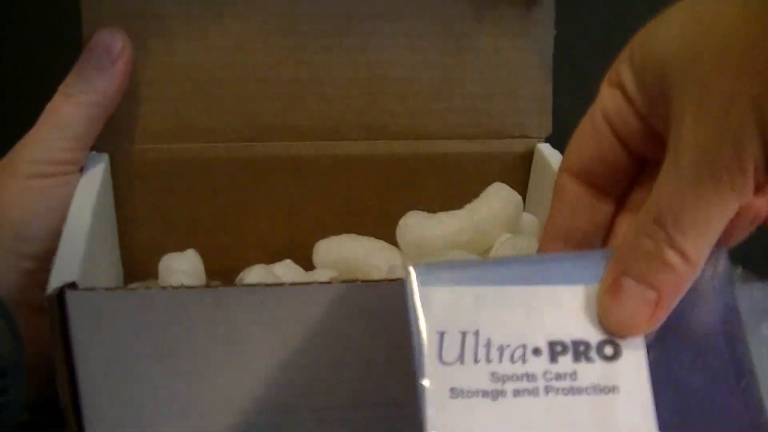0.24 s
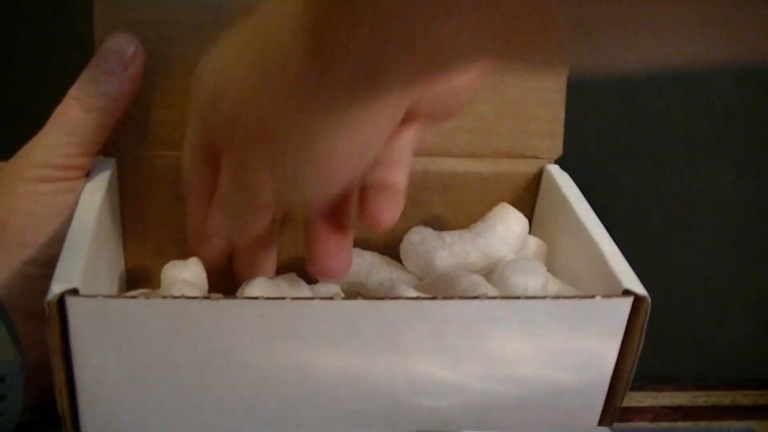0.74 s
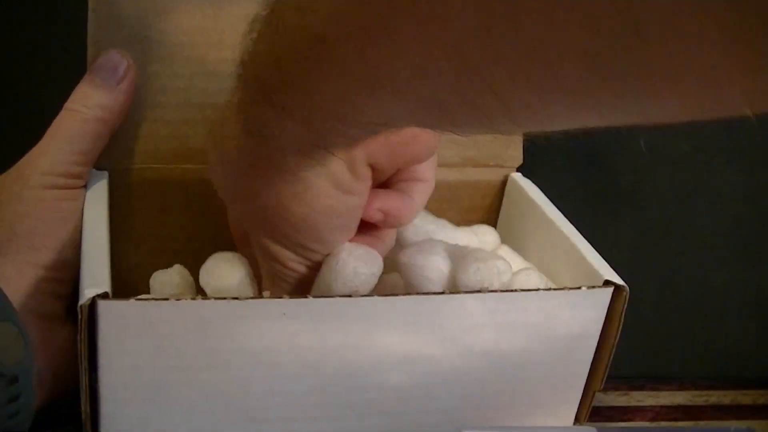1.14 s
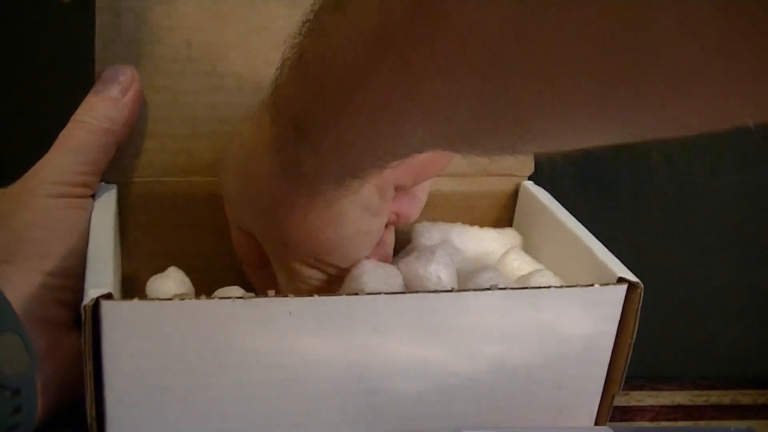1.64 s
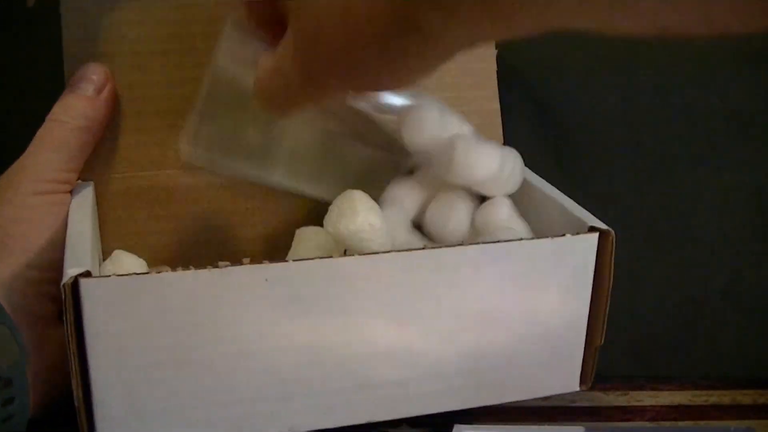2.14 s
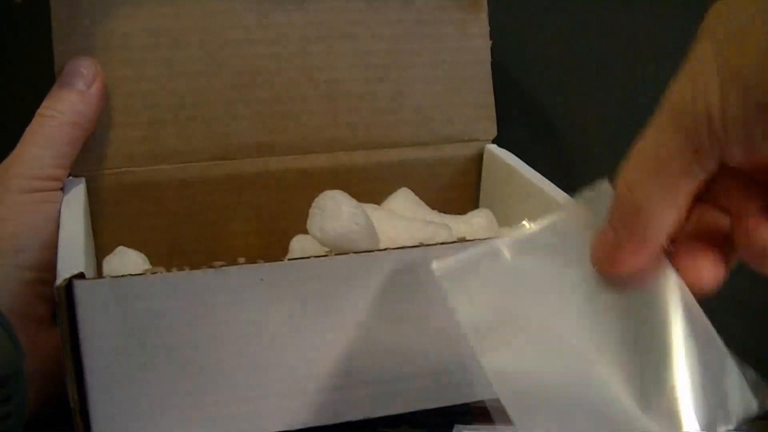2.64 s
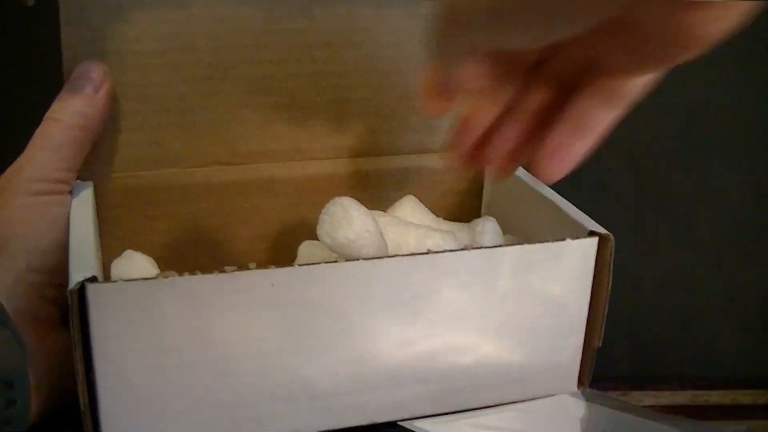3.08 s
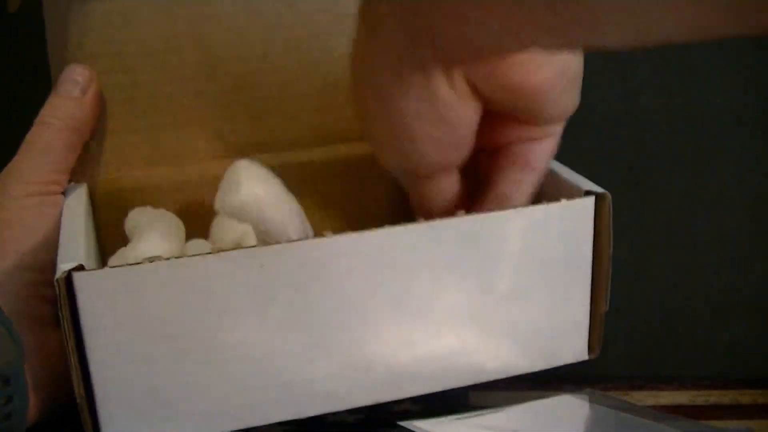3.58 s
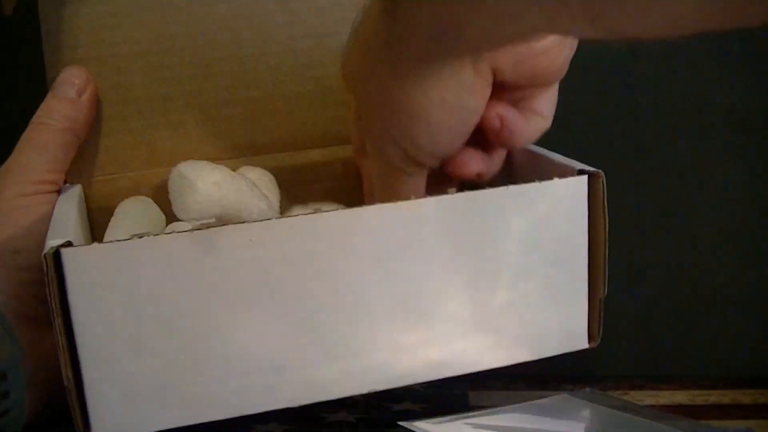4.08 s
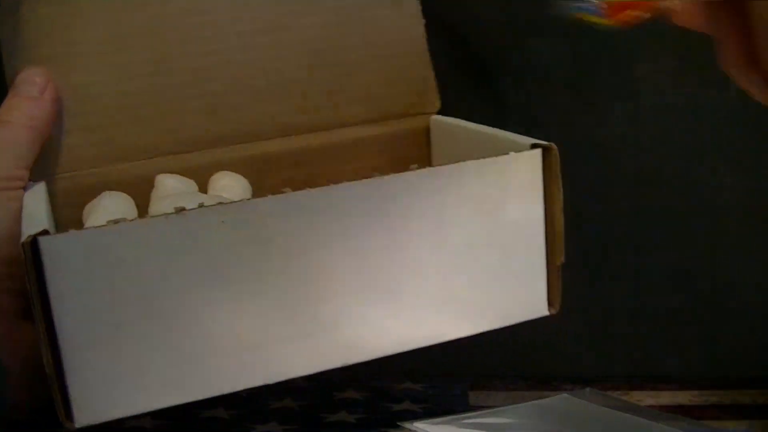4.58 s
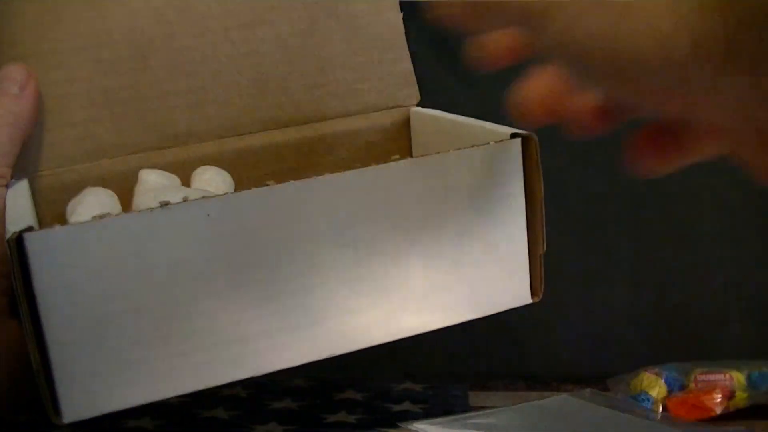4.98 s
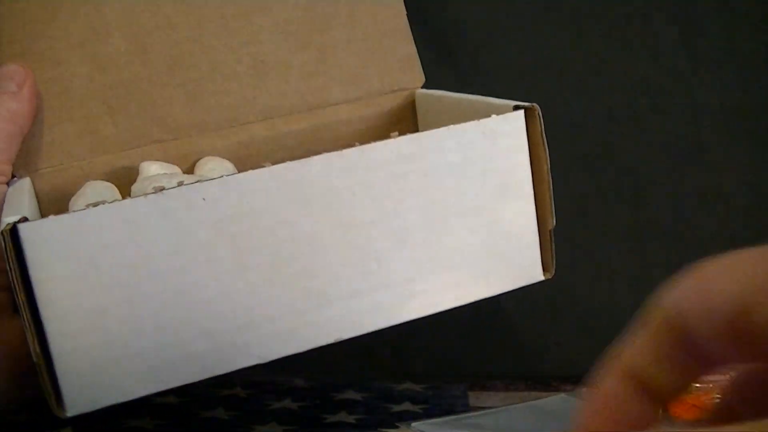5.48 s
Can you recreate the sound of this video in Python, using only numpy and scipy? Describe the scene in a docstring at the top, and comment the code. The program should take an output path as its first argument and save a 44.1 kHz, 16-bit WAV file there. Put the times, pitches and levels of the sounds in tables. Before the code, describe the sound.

Close, dry rummaging in a box of foam pieces: crunchy squeaking bursts, cardboard taps, crackling film, and small packets dropped onto a tabletop.

```python
"""Foam packing peanuts, dug through by hand in a small cardboard box, close to the microphone in a small room.
Foam is filtered random grains plus pitched chirps; slipping pieces knock as short damped swings; squeaks are
stick-slip pulses through a resonator. Plastic sleeves slide (fine grains) and snap (noise bursts); a cellophane
bag crinkles (frayed clicks). Goods thump on the table and the box booms, both by modal ringing. Room noise is low."""
import sys
import numpy as np
from scipy import signal
from scipy.fft import rfft, irfft
from scipy.io import wavfile
from scipy.ndimage import uniform_filter1d

SR = 44100
rng = np.random.default_rng(int(sys.argv[2]) if len(sys.argv) > 2 else 0)


def store_wav(level_fs):
    """Save 16-bit WAV to argv[1]."""
    pcm = np.round(np.clip(np.atleast_2d(level_fs), -1, 1) * 32767)
    wavfile.write(sys.argv[1], SR, pcm.T.astype(np.int16))


N = 252248
TIME = np.arange(N) / SR


def amp(db):
    """Decibels to gain."""
    return 10 ** (np.asarray(db) / 20)


def unit(x):
    """Scales to an rms of one."""
    return x / np.sqrt(np.mean(x ** 2) + 1e-20)


def read(points, hz):
    """Interpolates a table on a log-frequency axis."""
    f_hz, value = np.transpose(points)
    return np.interp(np.log(hz + 1), np.log(f_hz + 1), value)


def level(rows, column):
    """A dB column as a gain over time, -120 dB outside its rows."""
    rows = np.array(rows)
    return amp(np.interp(TIME, rows[:, 0], rows[:, column], left=-120, right=-120))


def add(mix, s, sound):
    """Mixes a sound in at time s."""
    part = mix[max(round(s * SR), 0):][:len(sound)]
    part += sound[:len(part)]


def colour(x, spectrum):
    """Filters by a spectrum table, to an rms of one."""
    gain = amp(read(spectrum, np.fft.rfftfreq(len(x), 1 / SR)))
    return unit(irfft(rfft(x) * gain, len(x)))


def wander(rate_hz):
    """Smooth random curve of unit rms: noise under a Gaussian low-pass."""
    lowpass = np.exp(-(np.fft.rfftfreq(N, 1 / SR) / rate_hz) ** 2)
    return unit(irfft(rfft(rng.standard_normal(N)) * lowpass, N))


def grains(per_s, spread_db):
    """Tiny slips at random moments, a few much larger than the rest."""
    size = amp(spread_db * np.minimum(rng.exponential(1, N), 4))
    sign = rng.choice([-1, 1], N)
    return unit(size * sign * (rng.random(N) < per_s / SR))


def patchy(x, patch_db=2.5):
    """Contacts come and go, each favouring its own pitches for some 25 ms."""
    z = signal.stft(x, nperseg=512)[2]
    over_hz = uniform_filter1d(rng.standard_normal(z.shape), size=4, axis=0)
    patches = unit(uniform_filter1d(over_hz, size=3, axis=1))
    return unit(signal.istft(z * amp(patch_db * patches))[1][:N])


def scatter(x, decay_s):
    """Spreads each sharp edge into a burst of tiny bounces."""
    t = TIME[:SR // 40]
    taps = rng.standard_normal(len(t)) * np.exp(-t / decay_s)
    return signal.oaconvolve(x, taps / np.linalg.norm(taps))[:N]


def fray(clicks, decay_s):
    """Turns each click into its own decaying puff of noise."""
    envelope = signal.lfilter([1], [1, -np.exp(-1 / (decay_s * SR))], abs(clicks))
    return envelope * rng.standard_normal(N)


def ring(x, modes):
    """Modal ringing of a body: decaying sines, peak gain one."""
    t = TIME[:SR // 2]
    response = sum(amp(db - 60 * t / t60_s) * np.sin(2 * np.pi * hz * t) for hz, db, t60_s in modes)
    return signal.fftconvolve(x, response / abs(rfft(response)).max())[:N]


def blow(s, db, hz):
    """Contact force centred on s: a push between rebounds, about a cycle long."""
    out, t = np.zeros(N), TIME[:SR // 40]
    u = np.pi * hz * (t - t.mean())
    add(out, s - t.mean(), amp(db) * np.cos(2 * u) * np.exp(-(u / 1.84) ** 2))
    return out


def flex(hz, swell_s):
    """Cardboard swings for a few cycles as the foam slips, then is damped."""
    t = TIME[:SR // 40]
    envelope = (t / swell_s) ** 2 * np.exp(-t / swell_s)
    return envelope / envelope.max() * np.sin(2 * np.pi * (hz * t + rng.random()))


# loose pieces go on shifting faintly after every stroke
SETTLE_DB, SETTLE_DB_PER_S = -20, 139


def strokes(rows, column, shape):
    """Each stroke takes hold quickly, builds while the hand pushes, then lets go and settles; powers add."""
    attack_db_per_s, build_db, release_db_per_s = shape
    power = np.zeros(N)
    for row in rows:
        start_s, length_s = row[:2]
        when = TIME[(TIME > start_s - 0.06) & (TIME < start_s + length_s + 0.6)]
        t = when - start_s
        after = np.maximum(t - length_s, 0)
        attack_db = attack_db_per_s * np.minimum(t, 0)
        rise_db = build_db * (np.clip(t / length_s, 0, 1) - 1)
        push = amp(row[column] + attack_db + rise_db)
        settling = amp(SETTLE_DB - SETTLE_DB_PER_S * after)
        release = np.maximum(amp(-release_db_per_s * after), settling)
        add(power, when[0], (push * release) ** 2)
    return np.sqrt(power)


def rub(pressure, speed, body, hiss, catches_per_s, catch_db, fizz_db, judder_db):
    """Catches drum on the surface while fine grain hisses; both share the hand's judder."""
    judder = amp(judder_db * wander(rate_hz=110))
    drum = unit(judder * patchy(colour(grains(catches_per_s, catch_db), body)))
    fizz = unit(judder * patchy(colour(grains(6 * catches_per_s, fizz_db), hiss)))
    return pressure * drum + speed * fizz


# room noise spectrum [f/Hz, level/dB]
AIR_SPECTRUM = [(20, -6), (45, -27), (60, 5.5), (85, -11.5), (300, -7.5), (1300, -23), (2500, -26.5),
                (16000, -34.5)]


def air():
    """Low room rumble: steady filtered noise, unit rms."""
    return colour(rng.standard_normal(N), AIR_SPECTRUM)


# room decay [f/Hz, t60/s]
ROOM_DECAY = [(150, 0.38), (3000, 0.36), (15000, 0.25)]


def room(x):
    """Dense wall reflections from 4 ms on, each band dying at its own speed."""
    taps = rng.standard_normal(SR // 2) * (TIME[:SR // 2] > 0.004)
    hz, t, z = signal.stft(taps, SR, nperseg=256)
    decay = amp(-60 * t / read(ROOM_DECAY, hz)[:, None])
    tail = signal.istft(z * decay)[1]
    return signal.fftconvolve(x, tail / np.linalg.norm(tail))[:N]


# hand and goods landing on the table [t/s, level/dB, f/Hz, table drive re push/dB]
THUMPS = [(0.147, -15, 262, -23), (0.329, -11.5, 165, -24), (0.521, -2.5, 420, -12), (0.5258, -5, 152, 4),
          (0.572, -10, 200, 0), (2.947, -17.5, 136, -17), (3.384, -16.5, 133, -14), (4.952, 1.5, 485, 11),
          (4.961, -5.5, 210, 8), (5.455, -13.5, 144, -19)]
# table top modes [f/Hz, level/dB, t60/s]
TABLE_MODES = [(82, -13, 0.7), (125.5, 1, 0.12), (197, 7, 0.21), (440, -12, 0.23), (485, 1, 0.13),
               (640, -2.5, 0.099)]


def thumps():
    """Contact push plus table ringing; the drive sets how far a landing rings or is damped."""
    push = sum(blow(s, db, hz) for s, db, hz, _ in THUMPS)
    drive = sum(blow(s, db + ring_db, hz) for s, db, hz, ring_db in THUMPS)
    return push + ring(drive, TABLE_MODES)


# bumps on the box [t/s, level/dB, f/Hz]
BUMPS = [(0.552, -6.5, 496), (1.056, -16, 302), (1.137, -15, 304), (2.269, -26.5, 200), (4.037, -2, 420)]
# box modes [f/Hz, level/dB, t60/s]
BOX_MODES = [(244, 0, 0.093), (263, 0, 0.33), (603, 0, 0.063)]


def box_bumps(ring_db=7):
    """The hollow box answers a bump with a short boom."""
    push = sum(blow(*row) for row in BUMPS)
    return push + amp(ring_db) * ring(push, BOX_MODES)


# cellophane bag crumpling in the fingers [t/s, level/dB]
CRINKLE = [(3.79, -51), (3.92, -31), (4.06, -36), (4.13, -29.5), (4.31, -40), (4.57, -45.5)]


def crinkle():
    """Small separate creases popping in thin film."""
    creases = fray(grains(per_s=120, spread_db=4.0), decay_s=0.0022)
    film_spectrum = [(900, -8), (3500, 11.5), (9000, -4.0), (15000, -4.0)]  # f/Hz, level/dB
    return level(CRINKLE, 1) * colour(creases, film_spectrum)


# plastic sliding over table and fingers [t/s, length/s, pressure/dB, hiss/dB]
SLIDES = [(0, 0.014, -20, -17), (0.148, 0.044, -20, -25.5), (0.315, 0.15, -30.5, -33),
          (0.495, 0.027, -25.5, -32), (0.555, 0.032, -26, -40), (2.75, 0.031, -48, -39),
          (2.87, 0.072, -41, -37.5), (2.935, 0.0068, -22.5, -22), (4.812, 0.076, -33.5, -32.5),
          (4.937, 0.024, -15.5, -22), (5.427, 0.0038, -26, -23), (5.484, 0.043, -42, -31.5),
          (5.63, 0.14, -49.5, -47)]
# stroke shape [attack/(dB/s), build-up/dB, release/(dB/s)]
SLIDE_SHAPE = (2800, 0.62, 600)
# spectra of table rub and plastic hiss [f/Hz, level/dB]
TABLE_RUB = [(60, -30), (250, -7), (550, 2), (850, 6), (1500, 3.5), (2400, -8), (10000, -21)]
PLASTIC_HISS = [(700, -65), (1600, 5), (3200, 11.5), (4500, 2.5), (6500, 10), (8500, 10.5), (11000, 4),
                (13000, -1.5), (16000, -38)]


def plastic():
    """Smooth sleeves slide with a finer grain than foam."""
    pressure, speed = (strokes(SLIDES, column, SLIDE_SHAPE) for column in (2, 3))
    return rub(pressure, speed, TABLE_RUB, PLASTIC_HISS,
               catches_per_s=4600, catch_db=-0.5, fizz_db=8.0, judder_db=2.77)


# snaps of film, sleeves and foam edges [t/s, crack level/dB, crack centre f/Hz, flapping sheet level/dB]
SNAPS = [(0.144, -26, 2570, -2), (0.2663, -27, 2400, -6), (0.5192, -2.5, 3050, -4.5),
         (0.5587, -5, 7500, -17), (0.8066, -2.5, 2750, -4), (1.356, -4.5, 5000, -7.5),
         (1.8972, -7, 7140, -6), (1.966, -1, 6800, -13), (2.1426, -1.5, 3960, -4), (2.3253, 6.5, 6400, -26),
         (2.4211, -5, 7500, -16), (2.7443, 3, 6860, -17), (2.753, -2, 5700, -4), (2.795, -9, 5600, -14),
         (2.8678, -11, 6230, -5), (2.938, -1.5, 6440, -5.5), (3.266, -1.5, 2580, -7),
         (3.2881, -3.5, 2960, -6), (4.022, 2.5, 4800, -5.5), (4.115, -9, 4450, -32), (4.123, -6, 3350, -8),
         (4.178, 2, 6900, -4), (4.222, 0, 3100, -9), (4.2793, -2, 8260, -9), (4.2918, 0.5, 5320, -10),
         (4.3094, 1.5, 6500, -28), (4.4, -5.5, 10100, -15), (4.418, -6, 6730, -22),
         (4.437, -5.5, 5750, -16), (4.464, -5, 8450, -10.5), (4.531, -5.5, 6600, -17),
         (4.807, -1.5, 5900, -10), (4.849, 2, 6250, -1.5), (4.935, -6, 2950, -5), (4.952, 3, 3040, -9),
         (4.9595, -17, 2480, -0.5), (4.984, 3.5, 2860, -25), (5.43, 0, 7500, -30), (5.488, 0.5, 7100, -9),
         (5.508, -5, 5200, -11), (5.5269, -7, 3870, -2), (5.558, -11, 7040, -21),
         (5.575, -8.5, 7300, -13.5), (5.667, -9.5, 2690, -52)]


def snaps(crack_s=0.00074, sheet_s=0.0011, crack_octaves=0.58, sheet_octaves=0.49, sheet_hz=1500):
    """A buckling sheet gives a crack and a quickly damped flap: two noise bands."""
    out, t = np.zeros(N), TIME[:SR // 50]
    log_hz = np.log2(np.fft.rfftfreq(len(t), 1 / SR) + 1)

    def burst(hz, octaves, decay_s):
        """Noise band with a fast onset and exponential decay."""
        bandpass = np.exp(-((log_hz - np.log2(hz)) / octaves) ** 2 / 2)
        band = irfft(rfft(rng.standard_normal(len(t))) * bandpass, len(t))
        return unit(band) * np.exp(-t / decay_s) * (1 - np.exp(-t / 0.00099))

    for s, crack_db, hz, sheet_db in SNAPS:
        crack = amp(crack_db) * burst(hz, crack_octaves, crack_s)
        flap = amp(sheet_db) * burst(sheet_hz, sheet_octaves, sheet_s)
        add(out, s, crack + flap)
    return out


# digs stirring the whole heap [t/s, length/s, pressure/dB, hiss/dB, floor drag/dB]
DIGS = [(0.835, 0.57, -33, -39.5, -40), (1.57, 0.18, -32.5, -40, -43.5), (1.955, 0.42, -30.5, -38, -41.5),
        (3.285, 1.027, -31.5, -41, -43.5)]
# topple shape over each dig [attack/(dB/s), build-up/dB, release/(dB/s)]
TOPPLE_SHAPE = (1400, 0, 37)
# box wall spectrum [f/Hz, level/dB]
WALL = [(60, -53), (240, -1), (400, -11.5), (560, 2.5), (820, 3), (1280, 2.5), (1550, -5), (2000, -5.5),
        (2500, -12), (3300, -11), (12000, -61)]


def topples(level_db=-7):
    """Loose pieces tap the cardboard at random, and on after a dig."""
    taps = colour(scatter(grains(per_s=110, spread_db=5.0), decay_s=0.00085), WALL)
    return amp(level_db) * strokes(DIGS, 2, TOPPLE_SHAPE) * taps


# foam squeezed against the box [t/s, length/s, groan/dB, rasp/dB, f/Hz]
SQUEAKS = [(3.813, 0.016, -15, -14.5, 885), (3.839, 0.011, -9, -17, 938), (3.864, 0.0056, -12.5, -22, 890),
           (3.93, 0.014, -10, -21, 1000), (3.962, 0.0099, -9.5, -27, 838), (3.982, 0.019, -9, -27, 913),
           (4.011, 0.009, -12.5, -18.5, 920)]
# stroke shape [attack/(dB/s), build-up/dB, release/(dB/s)]
SQUEAK_SHAPE = (1600, 2.4, 1160)
# foam rasp spectrum [f/Hz, level/dB]
RASP = [(500, -27), (1700, 2), (3000, -1.5), (4200, -10.5), (15000, -29)]


def squeak():
    """Uneven stick and slip: the pulses rasp, and keep one stiff patch of wall groaning."""
    s, *_, hz = np.transpose(SQUEAKS)
    turns = np.cumsum(420 * np.exp(0.22 * wander(rate_hz=240))) / SR  # slip rate near 420 Hz
    slips = np.diff(np.floor(turns), prepend=0) * amp(1.3 * wander(rate_hz=120))
    # double-pole resonator that follows the pitch
    turn = np.exp(2j * np.pi * np.cumsum(np.interp(TIME, s, hz)) / SR)
    pole = np.exp(-np.pi * 170 / SR)
    ringing = signal.lfilter([1], np.poly([pole, pole]), slips / turn)
    groan = (turn * ringing / np.sqrt(abs(ringing) + 1e-9)).real  # friction holds the swing back
    rasp = colour(scatter(fray(slips, decay_s=0.00088), decay_s=0.00052), RASP)
    groaning = strokes(SQUEAKS, 2, SQUEAK_SHAPE) * unit(groan)
    return groaning + strokes(SQUEAKS, 3, SQUEAK_SHAPE) * rasp


# foam slipping and knocking on the cardboard [t/s, level/dB, f/Hz, swell/s]
KNOCKS = [(0.806, 1.5, 700, 0.00045), (0.8422, -6.5, 860, 0.00042), (0.8654, -2, 765, 0.00024),
          (0.9306, -15.5, 697, 0.0012), (0.9718, -6.5, 1185, 0.0012), (1.1215, -12, 1227, 0.0026),
          (1.1361, -2, 760, 0.00064), (1.4223, -6.5, 790, 0.0012), (1.5753, -5.5, 790, .0009),
          (1.6466, -6.5, 780, .0009), (1.6582, -5, 930, 0.0016), (2.1104, 3.5, 825, 0.0005),
          (2.1422, -10, 790, 0.00046), (2.1511, 1, 800, 0.00053), (2.1781, -3.5, 793, 0.0018),
          (2.2106, 1, 860, 0.00024), (2.2185, -3.5, 1240, 0.00085), (2.2626, 4.5, 1130, 0.00038),
          (2.2682, 3.5, 690, 0.00031), (2.2735, 0.5, 900, 0.00065), (2.3052, -13, 890, 0.0011),
          (2.3565, -2.5, 720, 0.00067), (2.419, -13, 876, 0.0019), (3.288, 2.5, 786, 0.00036),
          (3.3888, -11, 645, 0.0017), (3.404, -2.5, 645, 0.00083), (3.424, -1.5, 797, 0.0011),
          (3.474, -4.5, 820, 0.00082), (3.4941, -5.5, 790, 0.0013), (3.5119, -1, 815, 0.00066),
          (3.5367, -3.5, 755, 0.00066), (3.5438, -10, 810, .0019), (3.5565, -3.5, 800, 0.00049),
          (3.5749, -10.5, 830, 0.0014), (3.647, -7, 747, 0.002), (3.6565, -1, 1060, 0.00065),
          (3.7223, 2.5, 757, 0.00056), (4.1339, -12, 1155, 0.0021), (4.183, -11.5, 1190, .0011),
          (4.2442, -3, 790, 0.0014), (4.2889, -0.5, 763, 0.00068), (4.3361, -10, 750, 0.00047),
          (4.3605, -17, 766, 0.0014)]


def knocks(scrape_db=-21):
    """Each freed piece flexes the cardboard: a quick slip knocks, a slow one squeaks; the foam scrapes."""
    out = np.zeros(N)
    for s, db, hz, swell_s in KNOCKS:
        swing = flex(hz, swell_s)
        scrape = abs(swing) * colour(rng.standard_normal(len(swing)), RASP)
        add(out, s, amp(db) * (swing + amp(scrape_db) * scrape))
    highpass = signal.butter(2, 260, "high", fs=SR, output="sos")  # a small panel radiates little bass
    return signal.sosfilt(highpass, out)


# chirp centre pitch along the dig [t/s, f/Hz]
CATCH_HZ = [(0.85, 800), (1.0, 1046), (1.34, 1226), (1.42, 906), (3.45, 760), (4.2, 975)]


def chirps(per_s=240, spread_octaves=0.339, spread_db=4.5, swell_s=0.0011):
    """Small squeaky catches, each at its own pitch around that of the place being rubbed."""
    out = np.zeros(N)
    for s in TIME[rng.random(N) < per_s / SR]:
        centre_hz = np.interp(s, *np.transpose(CATCH_HZ))
        hz = centre_hz * 2 ** (spread_octaves * rng.standard_normal())
        add(out, s, amp(spread_db * rng.standard_normal()) * flex(hz, swell_s))
    return unit(out)


# single finger pushes through the foam [t/s, length/s, pressure on box wall/dB, hiss/dB]
PUSHES = [(0.826, 0.047, -18.5, -44), (0.965, 0.11, -25.5, -30.5), (1.122, 0.073, -19, -22),
          (1.215, 0.2, -31.5, -40), (1.323, 0.034, -23.5, -29), (1.41, 0.015, -16, -24.5),
          (1.664, 0.05, -14.5, -30), (2.038, 0.089, -19, -26), (2.18, 0.079, -21, -44),
          (2.3, 0.046, -20.5, -59), (3.238, 0.013, -32, -37.5), (3.29, 0.115, -28.5, -32),
          (3.382, 0.055, -14.5, -26.5), (3.44, 0.06, -21, -35), (3.647, 0.027, -20, -35.5),
          (3.8, 0.014, -27, -40.5), (3.924, 0.0096, -15.5, -24.5), (3.99, 0.037, -20, -38),
          (4.123, 0.015, -16, -28.5), (4.223, 0.012, -19, -33.5), (4.281, 0.028, -50, -30)]
# stroke shapes [attack/(dB/s), build-up/dB, release/(dB/s)]
DIG_SHAPE = (210, 0.53, 103)
PUSH_SHAPE = (850, 0.46, 820)
# spectra of foam hiss and dull floor drag [f/Hz, level/dB]
FOAM_HISS = [(600, -13), (2000, -31), (4500, 2.5), (7000, 2.5), (9000, 3), (11500, -5.5), (15500, -11.5)]
FLOOR = [(90, -42), (240, -2.5), (400, -11), (800, -26), (4000, -70)]


def foam(wall_db=-3, chirp_db=-4.0):
    """Coarse foam rubs and chirps on itself and the box wall, and drags dully over the box floor."""
    pressure, speed = (np.hypot(strokes(DIGS, column, DIG_SHAPE), strokes(PUSHES, column, PUSH_SHAPE))
                       for column in (2, 3))
    drag = strokes(DIGS, 4, DIG_SHAPE) * colour(grains(per_s=100, spread_db=6.0), FLOOR)
    rubbing = rub(amp(wall_db) * pressure, speed, WALL, FOAM_HISS,
                  catches_per_s=1000, catch_db=0.5, fizz_db=3.5, judder_db=2.5)
    return drag + rubbing + amp(chirp_db) * pressure * chirps()


def scene():
    """Near-mono mid plus a faint side signal, over a low room rumble."""
    bumps = thumps() + box_bumps()
    film = snaps() + crinkle() + plastic()
    box = knocks() + foam() + topples() + squeak()
    box = box + amp(-10.5) * scatter(box, decay_s=0.0059)  # echoes between the box walls
    near = box + bumps + film + amp(-15) * scatter(film, decay_s=0.003)
    walls = room(amp(-13.0) * near + amp(-12) * bumps)
    mid = near + walls + amp(-47.5) * air()
    treble = signal.lfilter(*signal.butter(1, 2000, "high", fs=SR), near)
    side = amp(-20) * treble + amp(-22.5) * scatter(treble, decay_s=0.004)  # the highs lean to the right
    side += amp(-39.0) * room(near + bumps) + amp(-60.0) * air()
    side += amp(-24.5) * scatter(bumps, decay_s=0.0023)
    return np.array([mid - side, mid + side])


EDGE_HZ = 16000


def record(dry):
    """Clips at full scale, then low-passes at EDGE_HZ."""
    clipped = np.clip(dry, -1, 1)
    lowpass = signal.firwin(255, EDGE_HZ, window=("kaiser", 8), fs=SR)
    return signal.oaconvolve(clipped, lowpass[None], "same")


dry = scene()
out = record(dry)
store_wav(out)
```